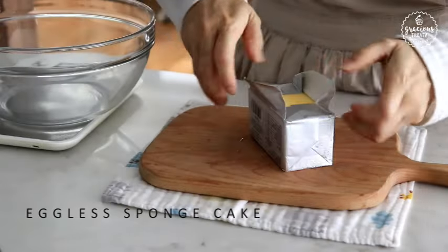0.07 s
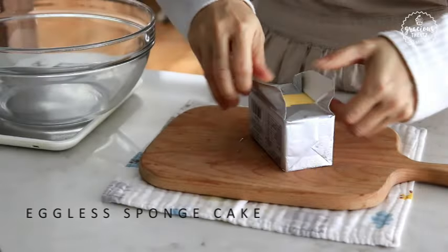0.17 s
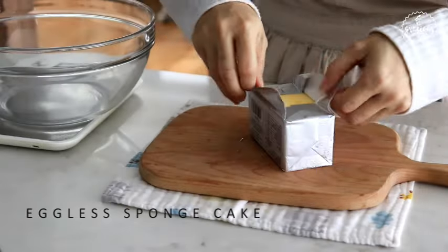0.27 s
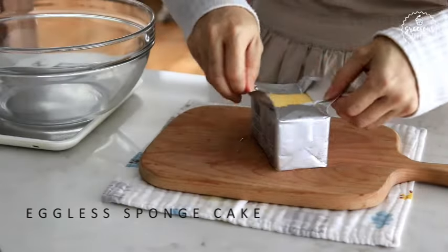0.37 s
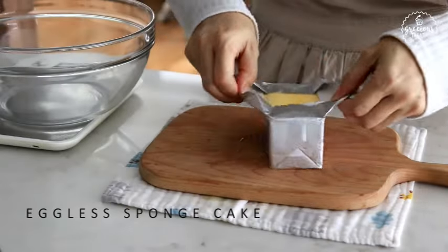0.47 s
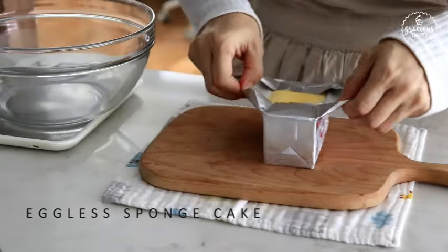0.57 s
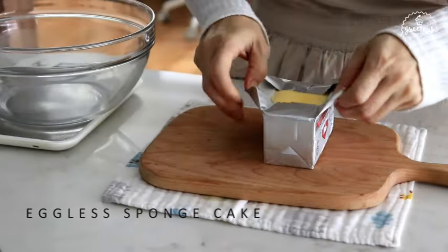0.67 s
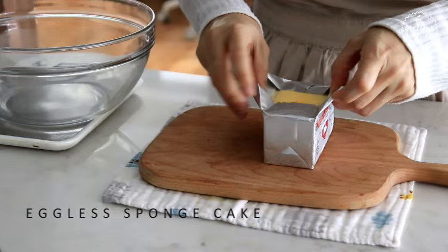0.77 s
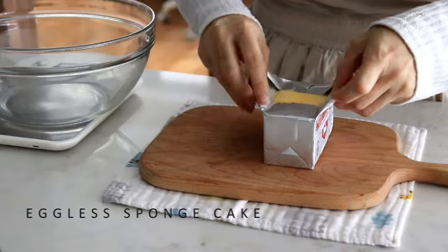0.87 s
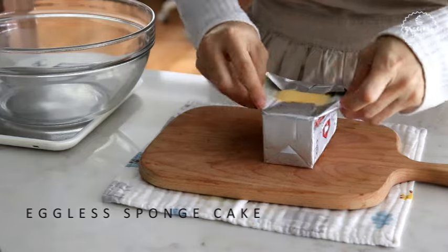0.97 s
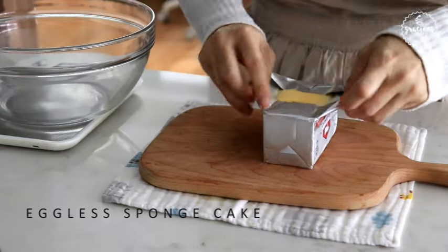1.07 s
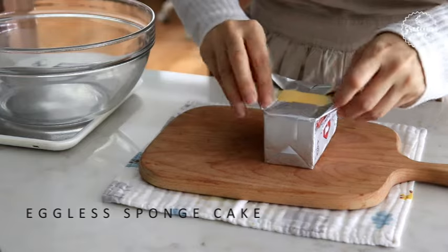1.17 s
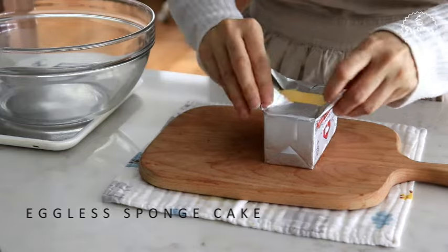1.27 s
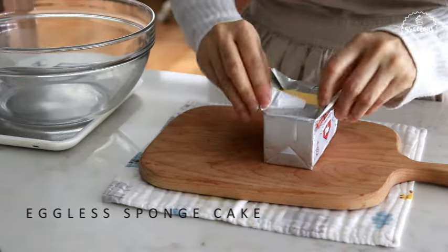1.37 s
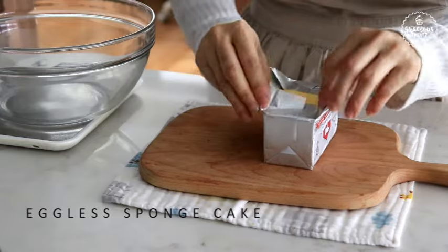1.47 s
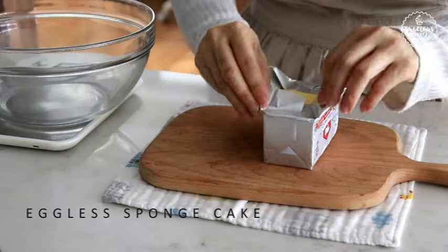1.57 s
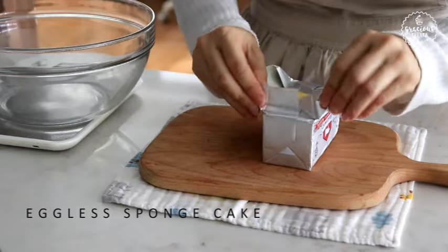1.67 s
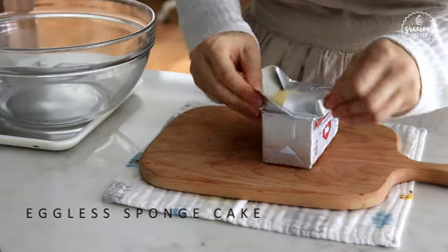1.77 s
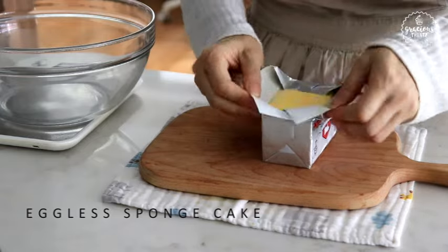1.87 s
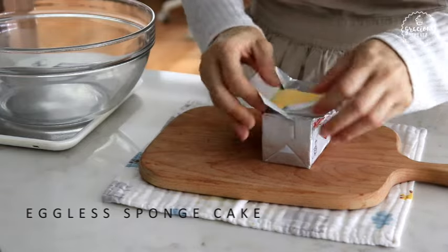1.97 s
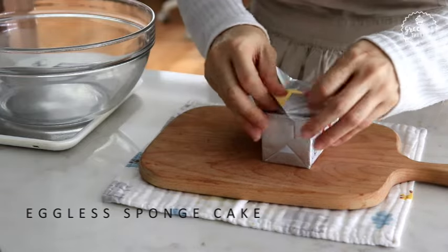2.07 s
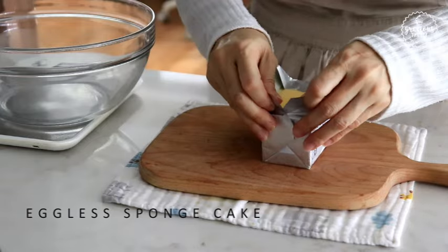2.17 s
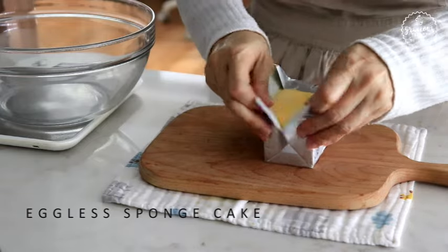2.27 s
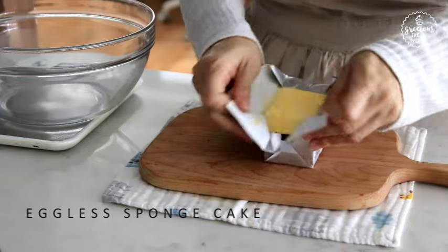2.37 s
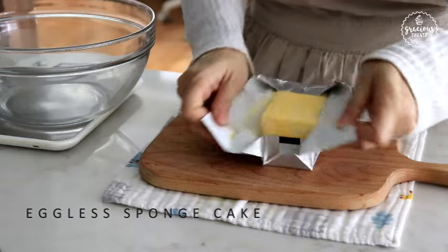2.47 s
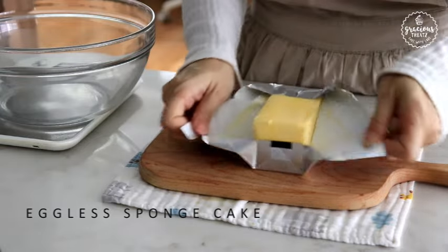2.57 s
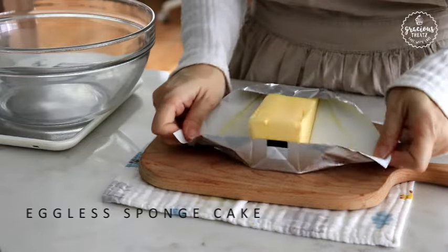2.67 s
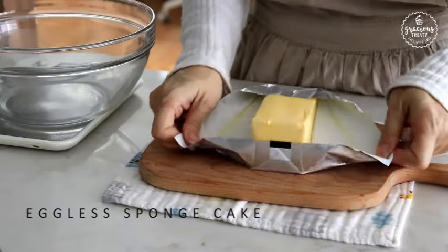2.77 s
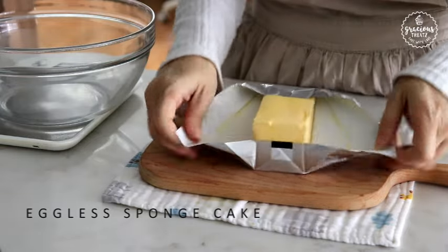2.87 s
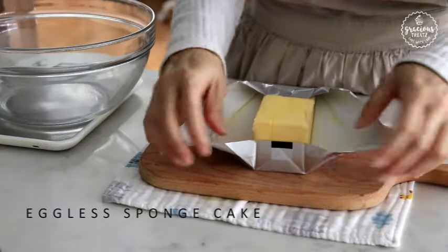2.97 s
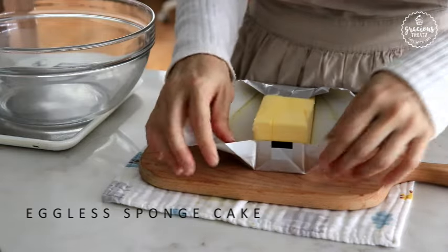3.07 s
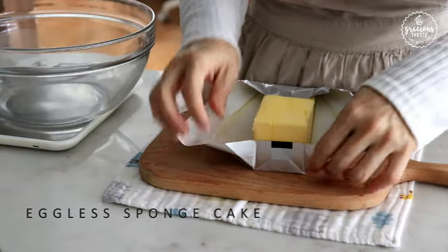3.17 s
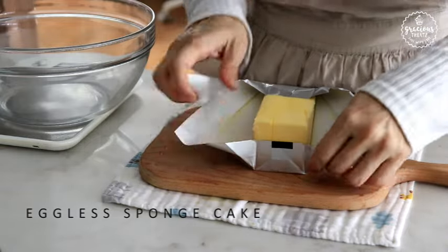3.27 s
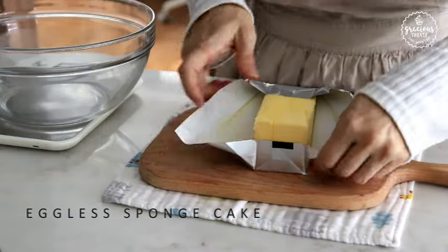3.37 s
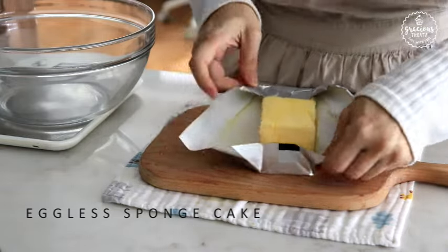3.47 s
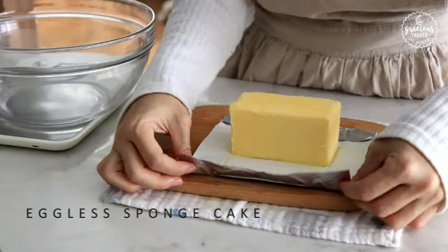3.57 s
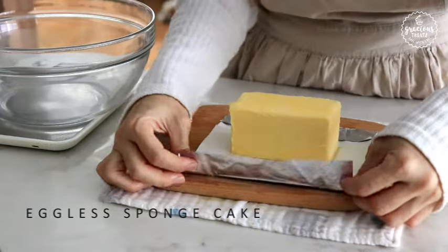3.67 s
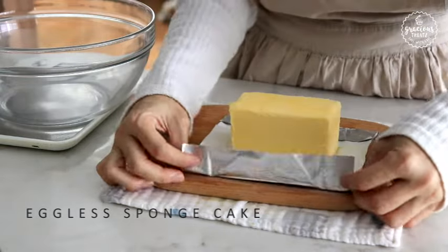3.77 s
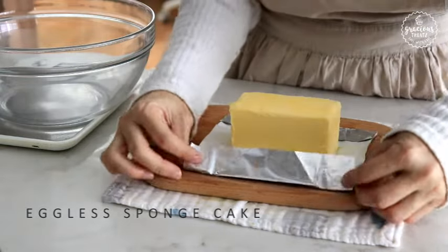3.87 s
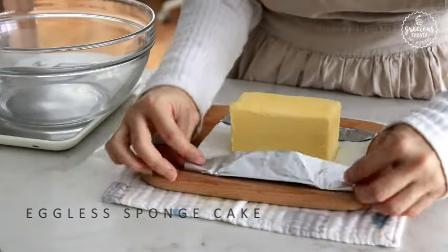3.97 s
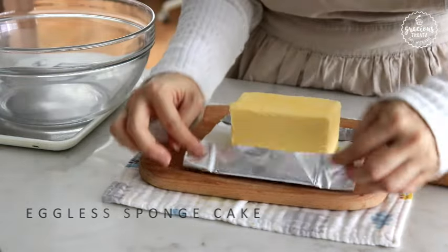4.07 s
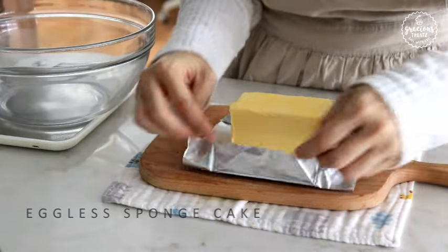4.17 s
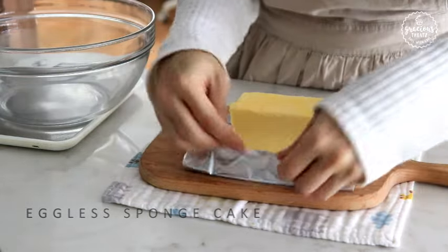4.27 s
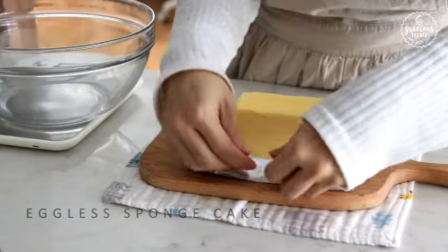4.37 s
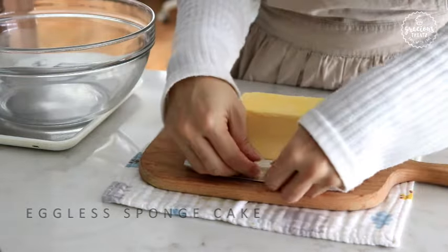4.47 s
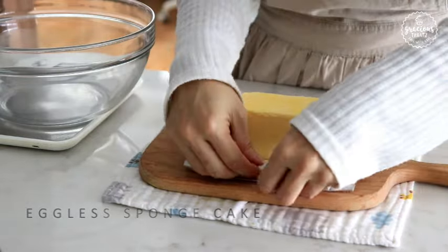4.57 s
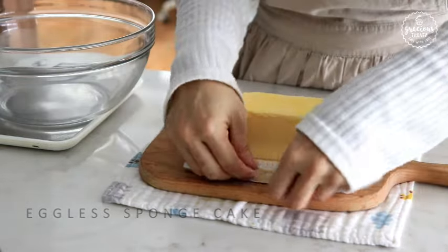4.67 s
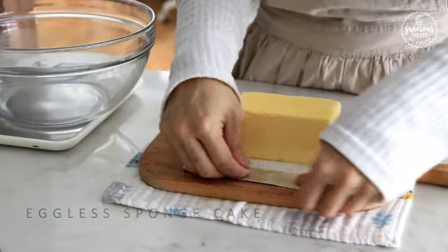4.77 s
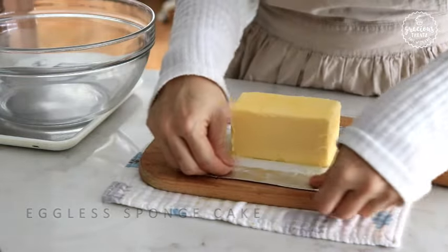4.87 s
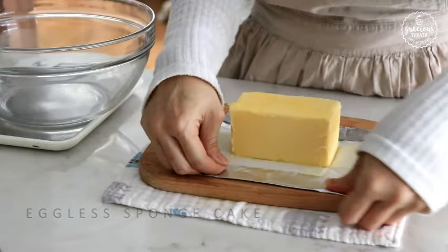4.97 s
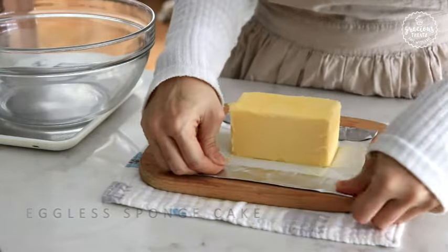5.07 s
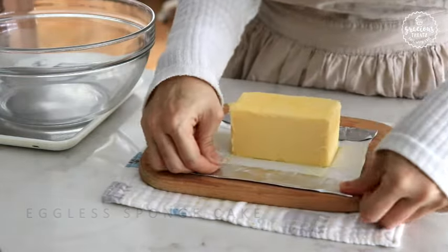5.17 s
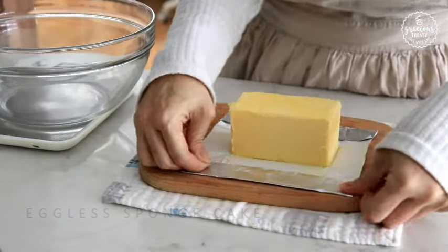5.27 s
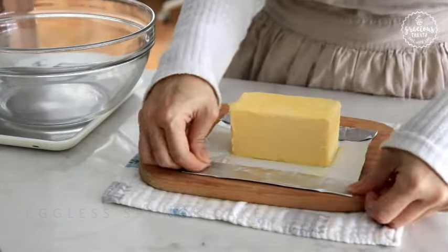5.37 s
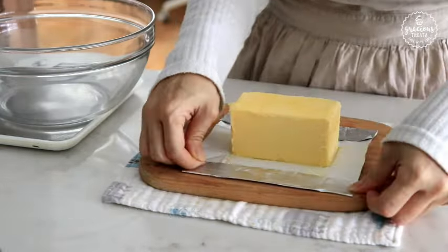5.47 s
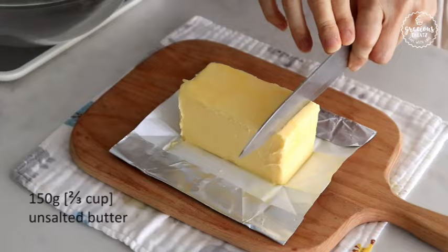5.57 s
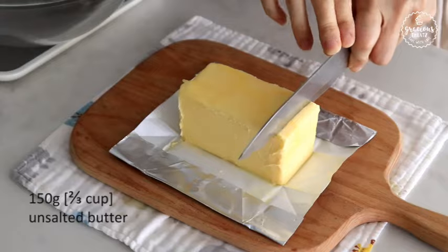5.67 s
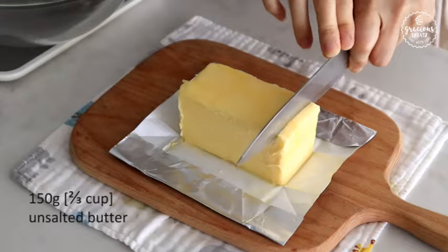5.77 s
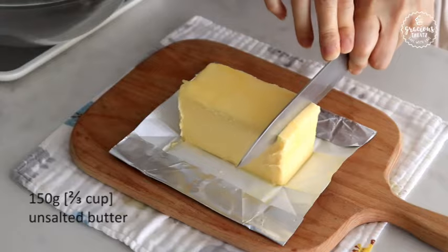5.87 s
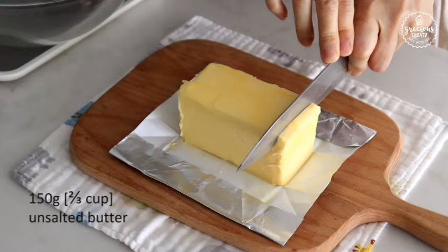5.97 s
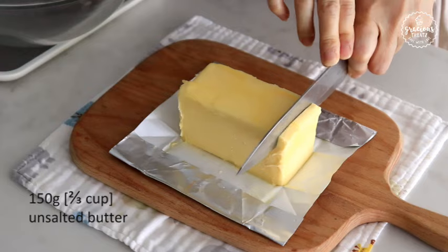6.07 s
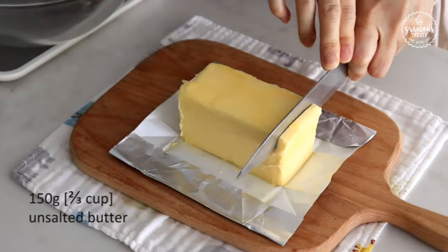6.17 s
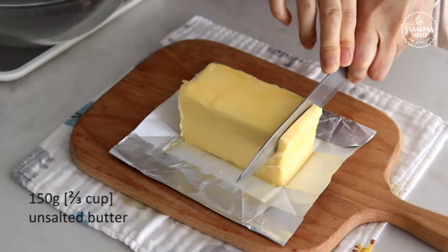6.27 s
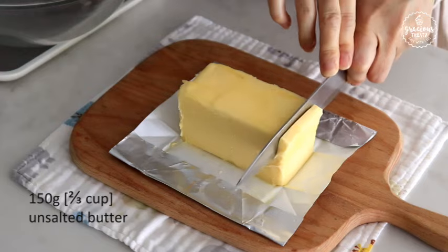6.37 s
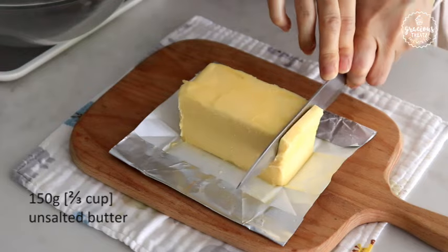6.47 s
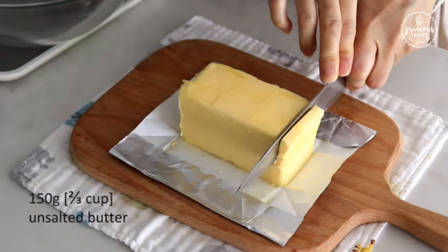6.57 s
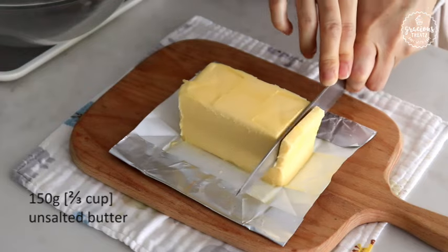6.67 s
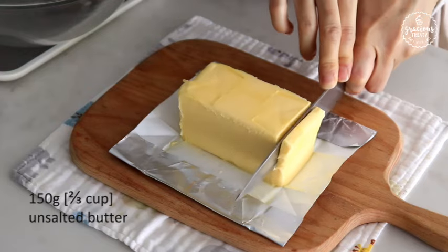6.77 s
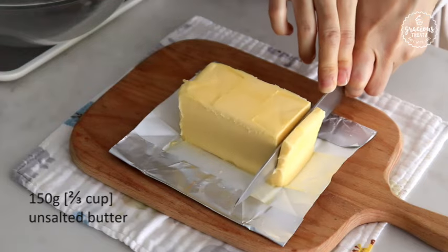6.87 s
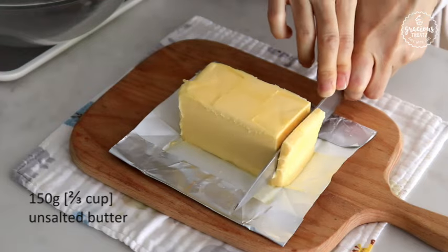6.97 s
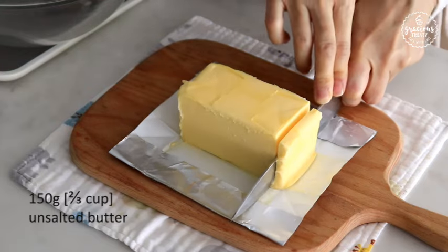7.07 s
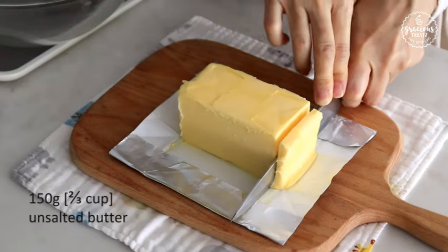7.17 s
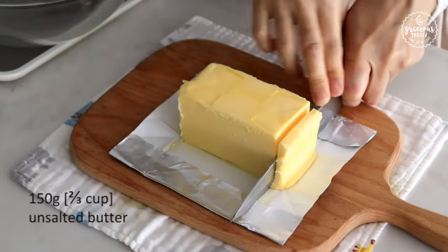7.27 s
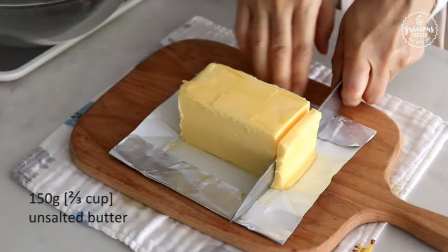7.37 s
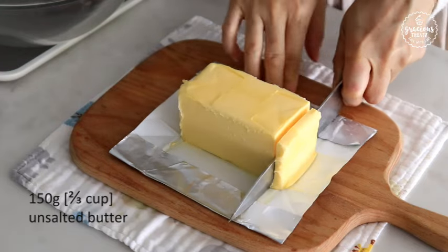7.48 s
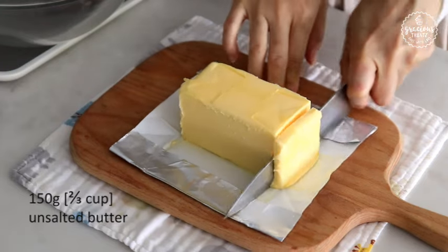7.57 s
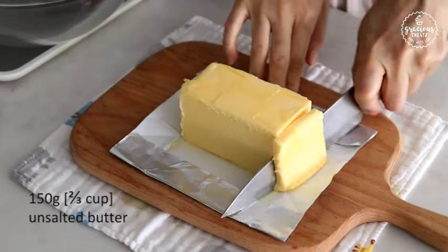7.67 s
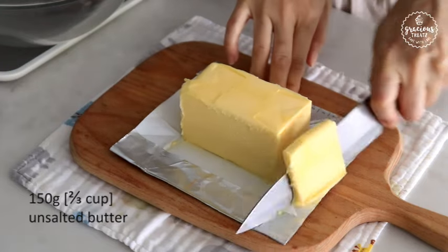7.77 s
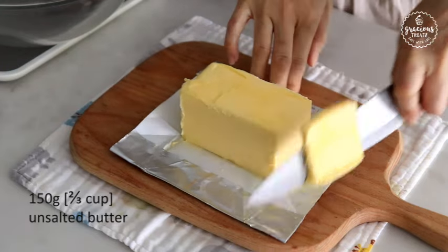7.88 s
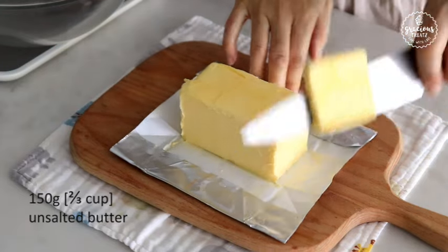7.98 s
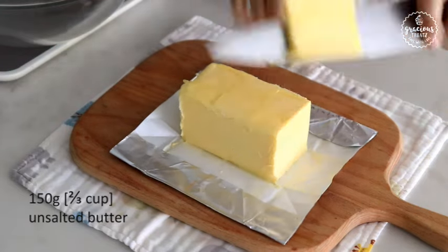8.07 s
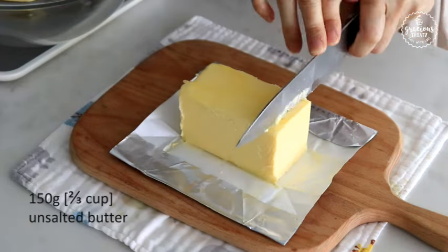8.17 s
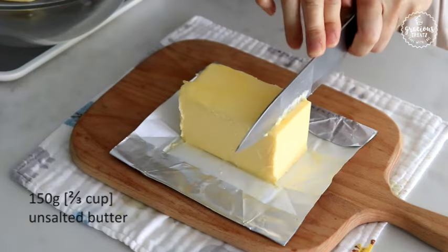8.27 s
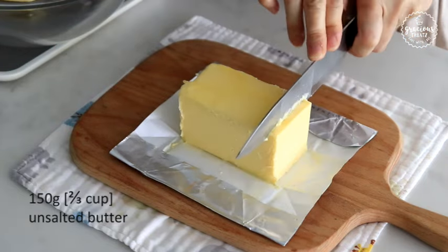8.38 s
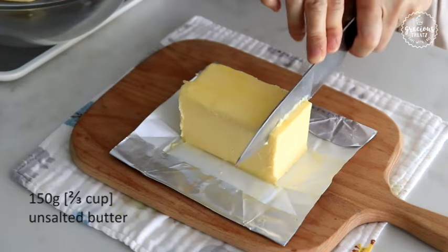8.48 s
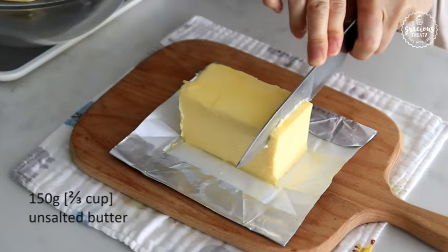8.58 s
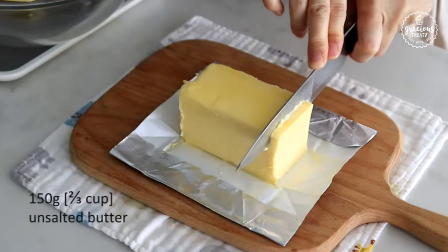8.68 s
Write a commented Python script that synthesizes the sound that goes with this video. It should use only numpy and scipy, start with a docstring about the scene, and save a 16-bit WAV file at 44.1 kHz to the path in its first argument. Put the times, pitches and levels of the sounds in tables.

```python
"""Kitchen worktop, one small microphone with a strong presence peak; a quiet hum lies under everything.
First hands peel stiff foil off a block of butter: noise-burst creases snap, showers of grains rustle.
The board thuds on its cloth in two low modes; after five seconds the handling thins to a lull.
Just after seven seconds a knife knocks the board, a few short decaying sines, and scrapes a slice away.
Snaps and knock also come back from the walls as a short tail of dull noise."""
import sys
import numpy as np
from scipy import signal
from scipy.fft import rfft, irfft
from scipy.io import wavfile

SR = 44100
rng = np.random.default_rng(int(sys.argv[2]) if len(sys.argv) > 2 else 0)


def file_out(sig):
    """Save sig as 16-bit WAV at sys.argv[1]."""
    # one column per channel
    cols = np.atleast_2d(sig).T
    # limit, then scale
    lim = np.clip(cols, -1, 1)
    pcm = np.round(lim * 32767).astype(np.int16)
    wavfile.write(sys.argv[1], SR, pcm)


N = 385434
SECONDS = np.arange(N) / SR


def from_db(db):
    """Turn decibels into an amplitude factor."""
    return 10 ** (np.asarray(db) / 20)


def rms_one(x):
    """Scale a signal to an RMS of 1."""
    return x / np.sqrt(np.mean(x ** 2) + 1e-20)


def band(x, low, high):
    """Butterworth band-pass with steep skirts, edges in Hz."""
    return signal.sosfilt(signal.butter(4, [low, high], "band", fs=SR, output="sos"), x)


def resonance(x, hz, width):
    """Two-pole resonance with gain 1 on top; centre and width in Hz."""
    r = np.exp(-np.pi * width / SR)
    top_gain = (1 - r * r) / 2
    return signal.lfilter([top_gain, 0, -top_gain], [1, -2 * r * np.cos(2 * np.pi * hz / SR), r * r], x)


def ring(t, hz, t60):
    """A sine that starts at t = 0 and decays by 60 dB in t60 seconds."""
    t = np.maximum(t, 0)
    return from_db(-60 * t / t60) * np.sin(2 * np.pi * hz * t)


def drift(rate):
    """Slow random wander of RMS 1: noise through two equal poles at rate Hz."""
    step = 40   # samples between the slow points
    r = np.exp(-2 * np.pi * step * rate / SR)
    noise = rng.standard_normal(N // step + 2002)
    slow = signal.lfilter([1], [1, -2 * r, r * r], noise)[2000:]   # skip the filter's start
    return np.interp(np.arange(N) / step, np.arange(len(slow)), rms_one(slow))


def follow(points):
    """Straight lines through (seconds, dB) points, read at every sample."""
    return np.interp(SECONDS, *np.transpose(points))


# Air of the quiet kitchen. Each row: frequency in Hz, relative spectral level in dB.
AIR_SPECTRUM = [(18, -53.5), (30, -18), (81, -26), (152, -8.5), (297, -5), (333, -13), (383, -10.5),
                (506, -18), (767, -12.5), (841, -20), (1340, -21), (1500, -22.5), (3010, -29),
                (3880, -24.5), (7590, -45), (9870, -74), (16700, -120)]
# Narrow bands under the air: appliance hum at 254 and 777 Hz, a broader band near 3.6 kHz where the
# microphone's presence peak colours the background, and a faint band near 4.9 kHz. Each row: centre in Hz,
# width of each of two passes in Hz, RMS level in dB before any swell.
NARROW_BANDS = [(254, 66, -75), (777.3, 44, -81.5), (3605, 350, -81), (4930, 220, -90.5)]
# The second hum comes forward. Each row: time in seconds, change of level in dB.
SECOND_HUM_SWELL = [(0, -4.5), (4.799, -12), (5.302, 4), (8.74, 6.5)]
AIR_DB = -66


def kitchen_noise():
    """Air noise shaped by its spectrum and gently wavering, with narrow bands of appliance hum and a broader
    band at the microphone's presence peak."""
    hz = np.fft.rfftfreq(N, 1 / SR)
    points_hz, points_db = np.transpose(AIR_SPECTRUM)
    shape = from_db(np.interp(np.log(hz + 1), np.log(points_hz), points_db))
    air = rms_one(irfft(rfft(rng.standard_normal(N)) * shape, N))
    air = from_db(AIR_DB + 1.3 * drift(5.8)) * air
    hums = []
    for centre_hz, width, level_db in NARROW_BANDS:
        once = resonance(rng.standard_normal(N), centre_hz, width)
        hums.append(from_db(level_db) * rms_one(resonance(once, centre_hz, width)))
    hums[1] = hums[1] * from_db(follow(SECOND_HUM_SWELL))
    return air + sum(hums)


ECHO_START_S, ECHO_T60_S, ECHO_DB = .018, 0.44, -32


def walls(x):
    """Reflections arrive after a short gap and die as dull noise."""
    t = np.arange(SR // 2) / SR
    fade_in = np.clip((t - ECHO_START_S) / 0.011, 0, 1)
    tail = rng.standard_normal(len(t)) * from_db(-60 * t / ECHO_T60_S) * fade_in
    tail = signal.lfilter([.45], [1, -.55], tail)   # the walls dull the treble
    tail = tail / np.sqrt(np.sum(tail ** 2))   # total energy 1
    return signal.fftconvolve(x, from_db(ECHO_DB) * tail)[:N]


# Board rocking on its cloth. Each row: time in seconds, push on the lower mode in dB,
# push on the upper mode in dB against the lower.
BOARD_PUSHES = [(0.028, -54.5, -2), (0.064, -52, -4), (0.505, -72, 10), (0.945, -73, 7), (1.032, -65, 5),
                (1.088, -63, 4.5), (1.937, -54, 3.5), (1.983, -50.5, -6), (2.479, -66, 4),
                (2.569, -61.5, -1), (2.717, -52, 1), (2.772, -51, -14), (3.191, -65, -13),
                (3.259, -66.5, 6), (3.464, -68.5, 12.5), (4.849, -71, 8), (7.21, -67.5, -7),
                (7.475, -67, -1), (7.526, -65.5, 8), (7.851, -68, 0)]
# What the worktop rings with, lower mode first. Each row: frequency in Hz, T60 in seconds.
WORKTOP_MODES = [(72, 0.21), (96, 0.22)]


def thuds():
    """The board rocks on its cloth: soft low pushes set two worktop modes beating."""
    s, lower_db, upper_db = np.transpose(BOARD_PUSHES)
    t, out = np.arange(SR) / SR, 0
    for (hz, t60), level_db in zip(WORKTOP_MODES, [lower_db, lower_db + upper_db]):
        pushes = np.zeros(N)
        pushes[np.round(s * SR).astype(int)] = from_db(level_db)
        out = out + signal.fftconvolve(pushes, ring(t, hz, t60))[:N]
    return band(out, 52, 125)


# Wooden board under the blade. Each row: frequency in Hz, starting level in dB against KNOCK_DB, T60 in seconds.
BOARD_MODES = [(560, -6.5, 0.022), (750, 8, 0.0077), (1270, -2.5, 0.011), (3700, -2, .005)]
KNOCK_S, KNOCK_DB = 7.1635, -29   # the blade reaches the board; level before the band-pass


def knock():
    """Steel on wood through butter and foil: a short dull ring of the board's modes."""
    t = SECONDS - KNOCK_S
    rings = sum(from_db(KNOCK_DB + level_db) * ring(t, hz, t60) for hz, level_db, t60 in BOARD_MODES)
    return band(rings, 486, 6700)


# Body, middle, presence and fizz bands of the foil. Each row: low edge in Hz, high edge in Hz.
FOIL_BANDS_HZ = [(350, 1400), (1400, 2800), (2800, 4600), (4600, 7500)]
# Resonances of sheet and microphone, one list per band. Each row: centre in Hz, width in Hz, gain in dB.
SHEET_RESONANCES = [
    [],
    [(2170, 300, -2)],
    [(3230, 300, -6.5), (3577, 340, 5.5), (3880, 350, -12.5)],
    [(4800, 450, -2), (5850, 700, 3.5), (6250, 500, -12)],
]
# Thin top of every crack and grain. In order: low edge in Hz, high edge in Hz.
AIRY_HZ = (7600, 9700)
AIRY_DB = -14   # gain of the thin top, beside the fizz


def voiced(x, k, plain):
    """Band k of the foil: part plain, part through the resonances that lie in it."""
    inside = band(x, *FOIL_BANDS_HZ[k])
    resonant = sum(from_db(gain_db) * resonance(inside, hz, width) for hz, width, gain_db in SHEET_RESONANCES[k])
    sound = plain * inside + resonant
    if k == 3:
        sound = sound + from_db(AIRY_DB) * band(x, *AIRY_HZ)
    return sound


# Presence band leaning brighter or duller as the sheet changes shape. Each row: time in seconds,
# dB added above the split and taken away below it.
PRESENCE_LEAN = [(0, 0), (.85, -1.5), (1.0, 2.5), (1.3, 2.5), (1.6, 0), (2.6, 0), (3.9, -1.5), (4.9, 2),
                 (5.2, -1.5), (5.55, -4), (7, 0), (8.74, 2)]
LEAN_SPLIT_HZ = 3100


def lean(x):
    """Raise the part above the split and lower the part below it, or the reverse."""
    upper = signal.sosfilt(signal.butter(2, LEAN_SPLIT_HZ, "high", fs=SR, output="sos"), x)
    lower = signal.sosfilt(signal.butter(2, LEAN_SPLIT_HZ, "low", fs=SR, output="sos"), x)
    gain = from_db(follow(PRESENCE_LEAN))
    return lower / gain - upper * gain   # the two are opposite in phase at the split


# Faint creeping of the sheet between rubs. Each row: time in seconds, level in dB before the band shares.
SHEET_CREEP = [(0, -62.5), (.24, -77.5), (.43, -71.5), (.8, -59), (.93, -59), (1.3, -73), (1.7, -77.5),
               (2.4, -67.5), (3.0, -67.5), (3.4, -75), (3.86, -65), (4.06, -71), (4.16, -81.5), (4.4, -74),
               (4.55, -67), (5.1, -73.5), (5.65, -93.5), (7.03, -89), (7.18, -74), (7.45, -96),
               (7.55, -64.5), (8.1, -69), (8.3, -85.5), (8.74, -95)]
# Band shares of the creep, in dB: low, middle, presence, fizz.
CREEP_BAND_SHARES = [-4, -7.5, -1.5, -15.5]
# Single rubs of fingers, foil and blade. Each row: time the top is reached in seconds, presence level in dB,
# rise over 20 dB in seconds, hold in seconds, fall over 20 dB in seconds,
# depth (low band against presence) in dB, fizz against presence in dB.
HAND_AND_BLADE_RUBS = [(0.017, -59.5, .03, .001, 0.15, 3, -18), (0.095, -58, .3, .001, 0.14, -24, -15.5),
                       (.335, -63.5, 0.094, .001, 0.016, -1, -19), (0.435, -65, 0.015, 0.0009, 0.3, 8, -12),
                       (0.525, -47, 0.0098, 0.028, 0.13, -13.5, -13.5),
                       (0.664, -33.5, 0.008, 0.0036, 0.017, -32, -33),
                       (0.672, -45, 0.083, 0.0087, 0.064, -8, -21),
                       (.766, -40.5, 0.029, .001, 0.04, -19, -19.5),
                       (0.987, -44, 0.047, .001, 0.086, -12, -23), (1.039, -52, .03, .05, .19, -24, -35),
                       (1.22, -50.5, 0.077, 0.063, 0.025, -9.5, -18.5),
                       (1.452, -61, 0.67, .001, 0.47, -5, -15), (1.64, -64, 0.1, 0.0011, 0.099, 5, -14),
                       (1.829, -60.5, 0.14, 0.023, 0.051, -2.5, -18),
                       (1.927, -59, 0.05, .001, 0.14, -1.5, -7.5),
                       (2.083, -56, 0.01, 0.0009, 0.084, 3.5, -6),
                       (2.285, -57.5, 0.077, 0.0011, 0.076, -2, -12),
                       (2.54, -68.5, 0.21, 0.042, 0.11, 11.5, -4), (2.608, -50, .13, .001, 0.04, -1.5, -17),
                       (2.656, -46.5, .03, .001, .11, 1, -20), (2.833, -65.5, .07, 0.046, .1, 3.5, -20),
                       (2.989, -53, 0.12, .001, 0.038, -3.5, -15.5),
                       (3.215, -62, 0.19, 0.0011, 0.033, 2, -14), (3.255, -62, 0.017, 0.11, .12, -4, -16),
                       (3.522, -58, 0.16, .001, 0.073, -6, -15),
                       (3.598, -58, 0.055, .001, 0.092, -0.5, -17),
                       (3.915, -57, 0.11, .001, 0.19, -14, -18),
                       (3.972, -50.5, 0.047, 0.055, 0.046, -15.5, -14.5),
                       (4.321, -51.5, 0.0061, .001, 0.04, 4, -12),
                       (4.411, -56.5, 0.012, .001, 0.12, -3, -11.5),
                       (4.739, -57.5, .35, .001, 0.032, -8.5, -13),
                       (4.812, -59.5, 0.087, 0.034, .1, -4, -11),
                       (4.891, -50.5, 0.037, .001, 0.24, -16.5, -14.5),
                       (5.281, -64, 0.1, .001, 0.18, -5.5, -13),
                       (5.533, -58, 0.065, .001, 0.021, -12.5, -15.5),
                       (7.141, -61.5, 0.033, 0.0008, 0.079, -14, -11),
                       (7.486, -48.5, .011, .001, 0.023, -7, -11.5),
                       (7.638, -58, 0.092, 0.039, .09, -20, -13),
                       (7.794, -39, 0.044, 0.049, 0.054, -17.5, -9),
                       (7.895, -59, 0.044, .001, 0.23, -15, -11)]
MIDDLE_DB, MIDDLE_FOLLOWS = -1, 0.66   # the middle band of a rub takes part of its depth
BLADE_FROM_S, BLADE_MIDDLE_DB = 7, -4   # steel slides with a hollower middle than foil


def handling():
    """Level of each band in time: the creep, and on it the power of every rub's rise, hold and fall."""
    t = np.arange(0, N, 32) / SR
    creep_db = np.interp(t, *np.transpose(SHEET_CREEP))
    power = from_db(creep_db + np.array(CREEP_BAND_SHARES)[:, None]) ** 2
    for s, level_db, rise, hold, fall, depth_db, fizz_db in HAND_AND_BLADE_RUBS:
        before, after = (s - t) / rise, (t - s - hold) / fall
        below_db = 20 * np.maximum(before, after).clip(0, 6)
        middle_db = MIDDLE_DB + MIDDLE_FOLLOWS * depth_db + BLADE_MIDDLE_DB * (s > BLADE_FROM_S)
        shares_db = np.array([depth_db, middle_db, 0, fizz_db])
        power += from_db(level_db - below_db + shares_db[:, None]) ** 2
    return [np.interp(SECONDS, t, np.sqrt(p)) for p in power]


# Unresonant part of the rustle as a plain factor: low, middle, presence, fizz.
RUSTLE_PLAIN_SHARES = [.5, .3, .13, .45]
GRAINS_PER_S, GRAIN_SPREAD_DB = 6000, 2.0   # in each band; mean excess of a grain's size


def rustle():
    """Thousands of small uneven creases a second, in clumps, under the movement of hands and blade."""
    out, level, clumps = np.zeros(N), handling(), drift(28)
    for k in range(4):
        born = rng.random(N) < GRAINS_PER_S / SR
        sizes = from_db(GRAIN_SPREAD_DB * np.minimum(rng.exponential(1, N), 5))
        signs = rng.choice([-1, 1], N)
        unevenness = from_db(0.91 * clumps + 1.3 * drift(34))   # shared clumps, then this band's own
        sound = voiced(born * sizes * signs * unevenness, k, RUSTLE_PLAIN_SHARES[k])
        if k == 2:
            sound = lean(sound)
        out += level[k] * rms_one(sound)
    return out


# Creases flipping and knife ticks. Each row: start in seconds, peak in dB before the microphone,
# panel pitch in Hz, panel share in dB, body share in dB, fizz share in dB, length scale of the burst in seconds.
CREASE_SNAPS = [(0.023, -41, 606, -6, -14, -21, 0.0012), (0.059, -17.5, 1420, -38, -29, -26, 0.0015),
                (0.279, -38, 1150, -17, -19, -27, 0.001), (0.436, -20.5, 1500, -19, -9, -34.5, 0.0012),
                (0.485, -38.5, 1010, -4, -10, -20, 0.0009), (0.509, -13, 1500, -21, -15.5, -14.5, 0.00098),
                (0.531, -30, 1500, -32, -18, -22, 0.00056), (0.622, -15, 996, -17, -15, -31.5, 0.0012),
                (0.754, -30.5, 1310, -18, -6, -29, 0.0013), (0.765, -30.5, 1500, -25, -9, -26, 0.0013),
                (0.814, -44, 1160, -18, -9.5, -18, 0.0009), (0.849, -39.5, 1450, -10, -11, -29, 0.00094),
                (0.886, -46, 1140, -11, -13, -32, 0.0011), (0.939, -29, 1470, -15, -7, -34, 0.00061),
                (0.964, -6.5, 1430, -60, -23, -33.5, 0.00078), (1.024, -26, 1130, -28, -19, -30.5, 0.001),
                (1.312, -31, 727, -3.5, -12, -43, 0.0013), (1.389, -37, 1490, -22, -20, -24, 0.0019),
                (1.604, -45, 810, -11, -13, -24, 0.0009), (1.63, -36, 907, -12.5, -5, -27, 0.00086),
                (1.803, -44, 689, -27, -21, -33, 0.00078), (1.838, -41, 1470, -5, -12, -29, 0.0015),
                (1.925, -33.5, 472, 1, -22.5, -8.5, 0.00093), (1.94, -38, 464, 3, -17, -25, 0.0011),
                (1.986, -35, 1400, -25, -18, -18, 0.0011), (2.084, -25, 1010, -17.5, -13, -13, 0.00099),
                (2.283, -39, 1110, -19, -27, -12, 0.0011), (2.471, -22, 1340, -6.5, -7.5, -20.5, 0.00057),
                (2.524, -34, 1470, -8, -16, -22, 0.0013), (2.551, -26, 735, -8, -11, -29, 0.00077),
                (2.567, -32, 864, -8, -16, -11, 0.0012), (2.582, -26, 1040, -5.5, -7, -46, 0.0009),
                (2.595, -32, 1350, -21, -16, -38, 0.0022), (2.608, -25.5, 956, -36, -19, -27, 0.001),
                (2.65, -33, 1250, -16, -17, -28, 0.0009), (2.67, -34, 1500, -10, -15, -33, 0.00098),
                (2.662, -23.5, 493, -17, -5, -24, 0.0019), (2.701, -30, 1210, -17, -2, -33, 0.0009),
                (2.78, -29.5, 1220, -5.5, -4.5, -47, 0.00081), (2.811, -23.5, 1490, -14, -8, -40, 0.00088),
                (2.976, -37.5, 1500, -4, -9, -28, 0.00076), (2.989, -28, 842, -13.5, -10.5, -39, 0.0011),
                (3.158, -39.5, 1140, -15, -8, -38, 0.0016), (3.188, -35.5, 452, -6, -17, -23, 0.00087),
                (3.258, -27.5, 1370, -16, -22, -31, 0.0012), (3.345, -26.5, 1480, -14.5, -8, -23, 0.0008),
                (3.468, -23, 1390, -20, -11, -18, 0.001), (3.503, -38.5, 1210, -19, -22, -31, 0.0012),
                (3.526, -33, 1420, -12.5, -6, -33, 0.0016), (3.579, -25, 1350, -19, -15.5, -24.5, 0.0012),
                (3.784, -35.5, 401, -20.5, -18, -38.5, 0.0014),
                (4.324, -26.5, 471, -22.5, -15, -26, 0.0011), (4.413, -27.5, 1420, -33, -18.5, -29, 0.0009),
                (4.475, -44, 762, -16, -14, -14.5, 0.0013), (4.557, -27, 624, -30.5, -18.5, -15, 0.0009),
                (4.624, -24, 468, -40, -25, -20.5, 0.00083), (4.713, -31.5, 1500, -22, -20, -28, 0.00042),
                (4.737, -32.5, 1290, -26, -19, -35, 0.0013), (4.836, -27, 1500, -25.5, -26, -29, 0.00098),
                (4.866, -15, 1010, -32.5, -21, -24, 0.001), (5.535, -48, 778, -25, -14, -24, 0.0009),
                (7.077, -45.5, 759, -21, -16, -27.5, 0.0013), (7.369, -47.5, 711, -23, -15.5, -32, 0.00076),
                (7.48, -32, 1230, -25, -23, -25, 0.001), (7.54, -27, 1470, -23, -29, -32.5, 0.001),
                (7.614, -48, 649, -18, -21, -8, 0.0017), (7.82, -30.5, 770, -14, -34, -12, 0.0013),
                (7.873, -27, 773, -31, -19.5, -22, 0.0008),
                (8.085, -34.5, 756, -32.5, -16.5, -22.5, 0.00059)]
# Unresonant part of a snap as a plain factor: panel, body, presence, fizz.
SNAP_PLAIN_SHARES = [.5, .45, .4, .4]
PRESENCE_SHARE_DB = -8   # alike in every snap
PANEL_Q = 5.3   # panel pitch over width


def snaps():
    """A crease lets go in tiny cracks that swell and die in milliseconds; the flat panel beside it rings."""
    lead, length_samples = 256, 1024
    out = np.zeros(N + length_samples)
    t = np.arange(-lead, length_samples - lead) / SR
    for s, peak_db, panel_hz, panel_db, body_db, fizz_db, length in CREASE_SNAPS:
        late = t / length - 1.6   # the burst is strongest 1.6 lengths after its start
        swell = np.exp(-np.abs(late) ** (4 / 3))
        afterglow = 0.057 * (late > 0) * np.exp(-t / 0.0076)
        burst = rng.standard_normal(length_samples) * (swell + afterglow)
        parts = [voiced(burst, k, SNAP_PLAIN_SHARES[k]) for k in range(4)]
        panel_ring = rms_one(resonance(parts[0], panel_hz, panel_hz / PANEL_Q))
        parts[0] = 0.38 * parts[0] / np.abs(parts[0]).max() + panel_ring / 8
        shares_db = [panel_db, body_db, PRESENCE_SHARE_DB, fizz_db]
        snap = sum(from_db(share) * part / np.abs(part).max() for share, part in zip(shares_db, parts))
        at = round(s * SR)
        out[at:at + length_samples] += from_db(peak_db) * snap / np.abs(snap).max()
    return out[lead:N + lead]


KNOCK_WET_DB = 8   # the board throws more into the room than the thin foil
SIDE_DB = -39.5   # gain of the left-right difference


def scene():
    """Foil, knife and board in the kitchen, all but the same in both channels."""
    creases, blade = snaps(), knock()
    room = walls(creases + from_db(KNOCK_WET_DB) * band(blade, 400, 1500))
    mid = kitchen_noise() + room + thuds() + blade + rustle() + creases
    smear = rng.standard_normal(300) / np.sqrt(300)   # the faint left-right difference is a blurred copy
    side = from_db(SIDE_DB) * band(signal.fftconvolve(mid, smear)[:N], 170, 9000)
    return np.array([mid + side, mid - side])


OFFSET = .0014   # of full scale
CUTOFF_HZ = 9900   # 30 dB down from here up


def record(dry):
    """The treble rolls off, the converter adds a small offset, the top is cut."""
    dull = signal.sosfilt(signal.butter(3, 7000, fs=SR, output="sos"), dry)
    return signal.sosfilt(signal.cheby2(12, 30, CUTOFF_HZ, fs=SR, output="sos"), dull + OFFSET)


dry = scene()
out = record(dry)
file_out(out)
```